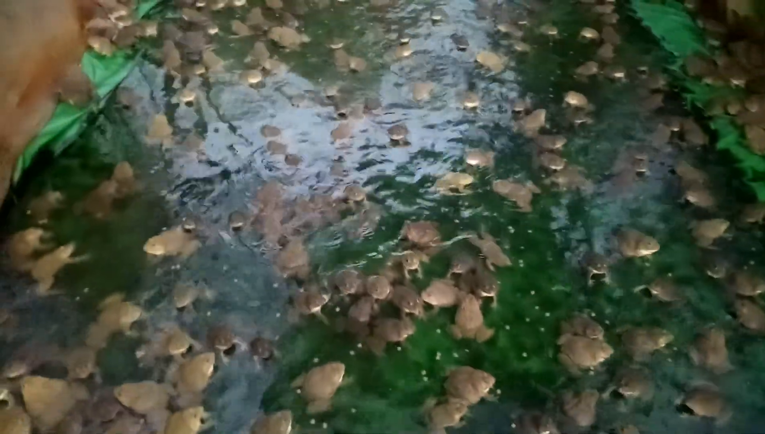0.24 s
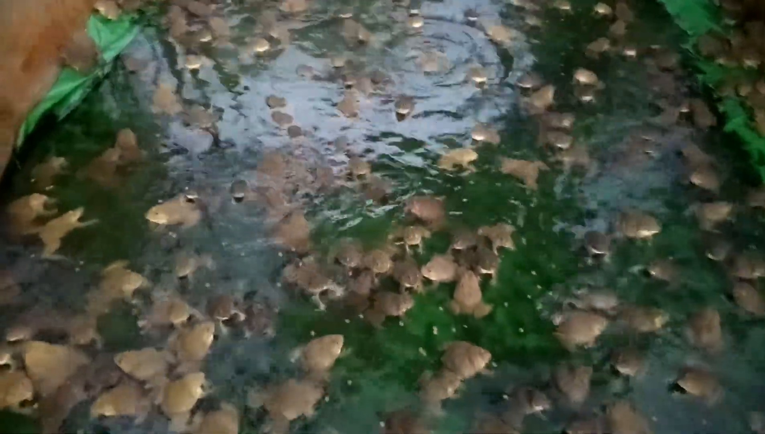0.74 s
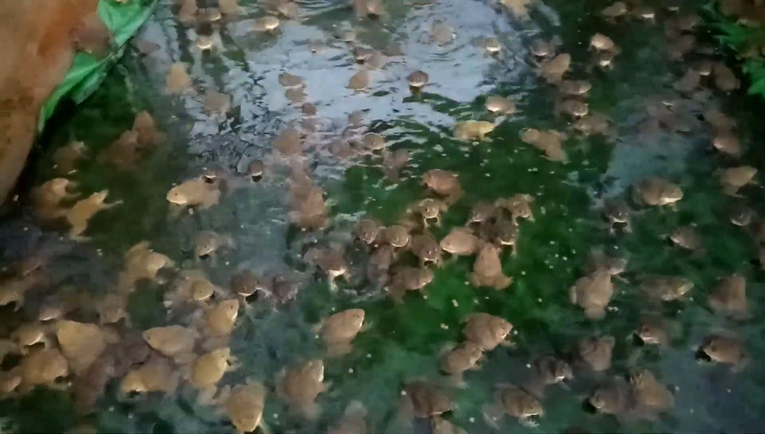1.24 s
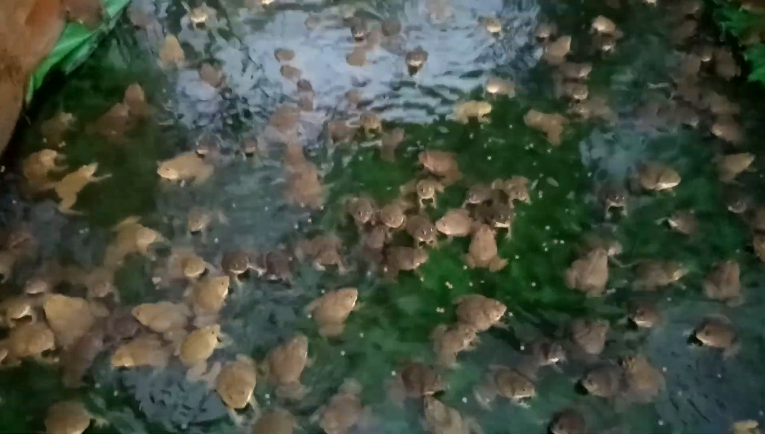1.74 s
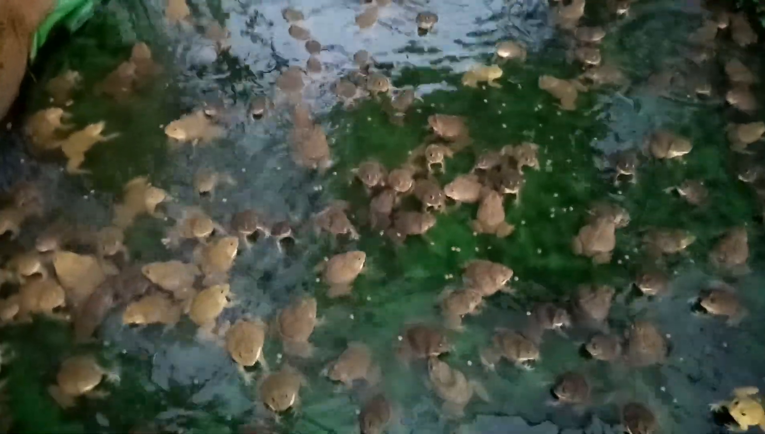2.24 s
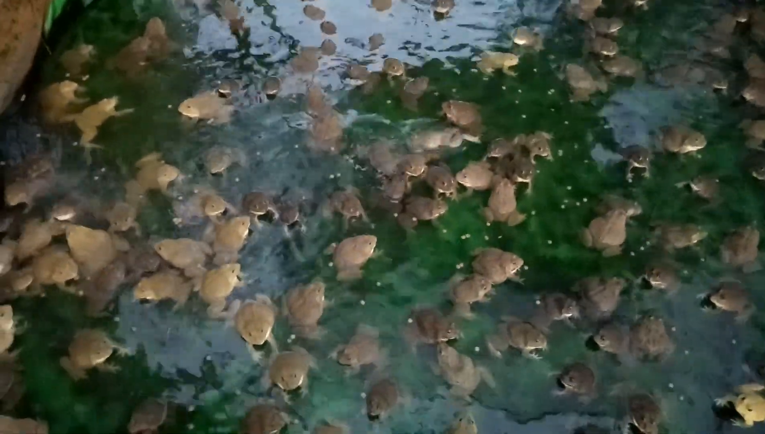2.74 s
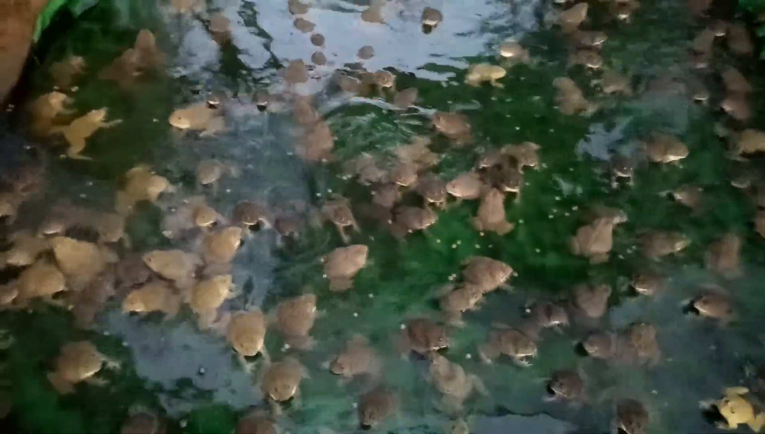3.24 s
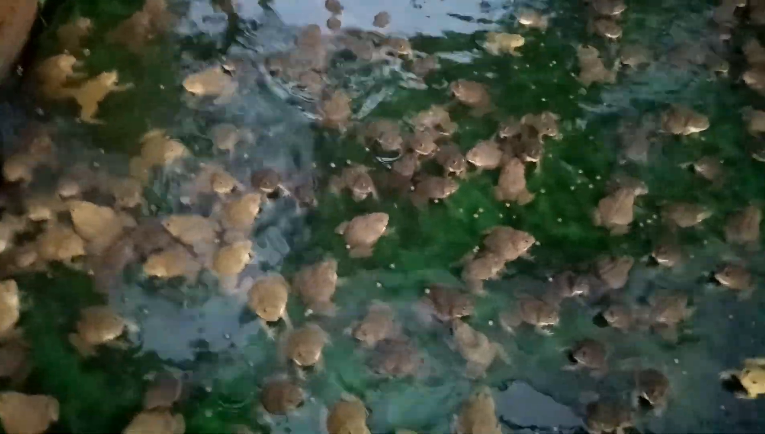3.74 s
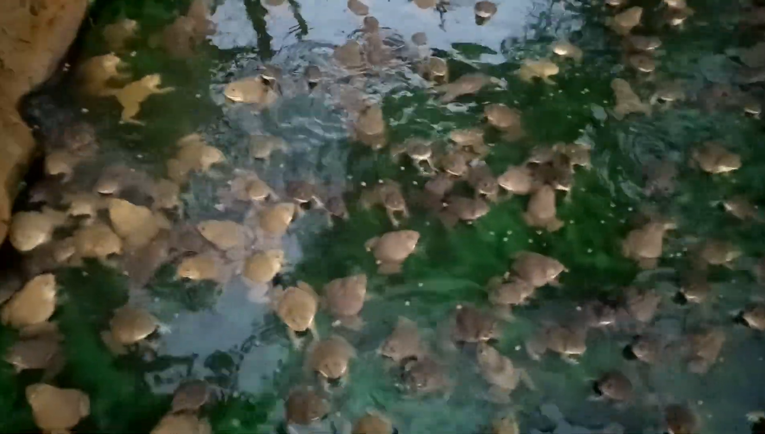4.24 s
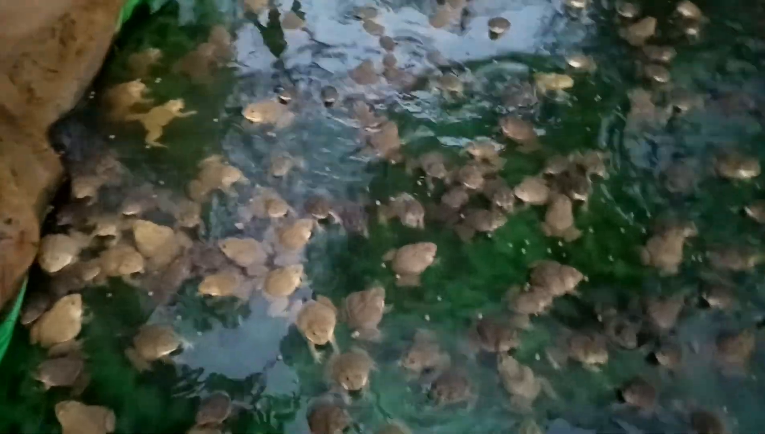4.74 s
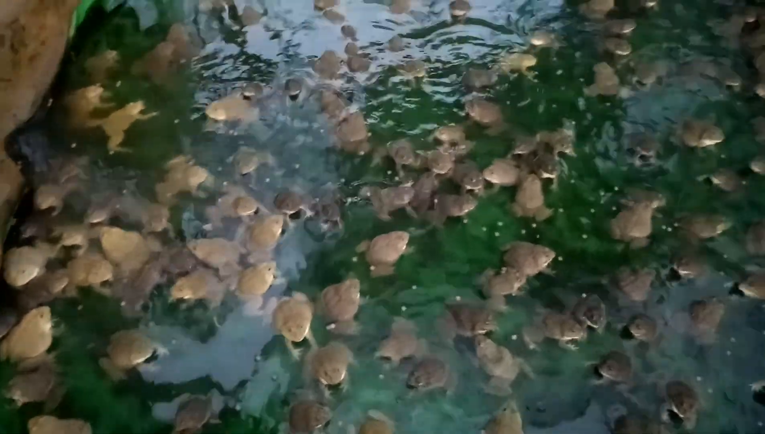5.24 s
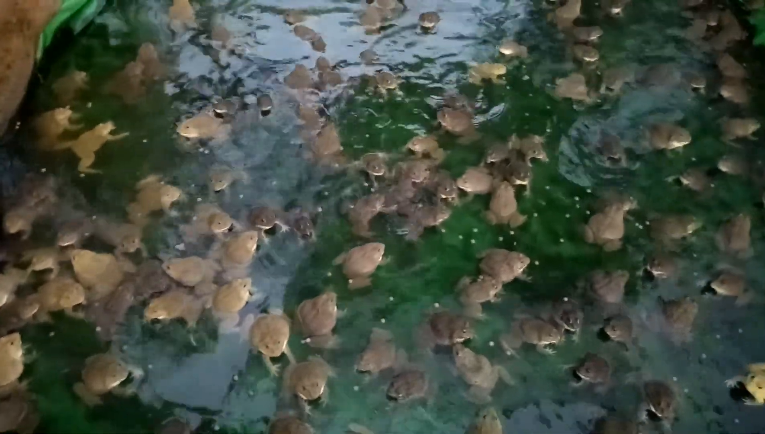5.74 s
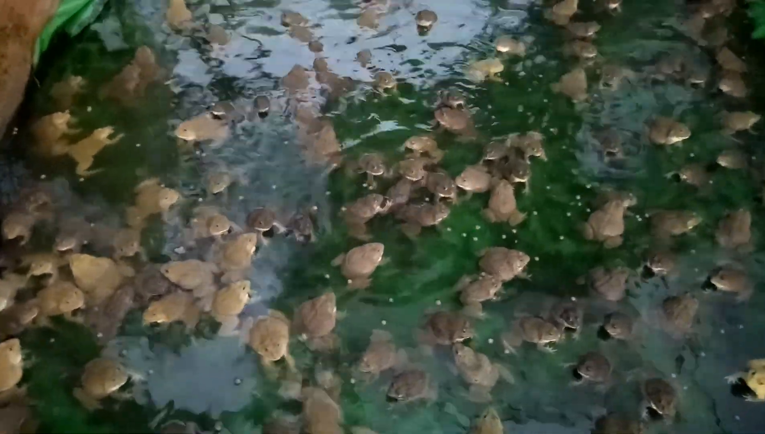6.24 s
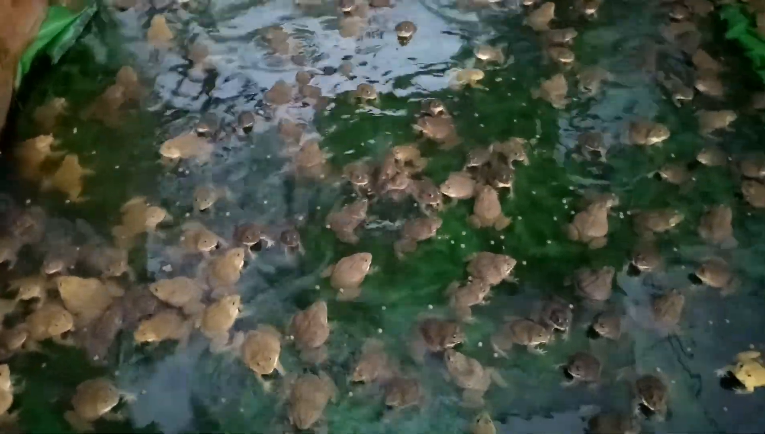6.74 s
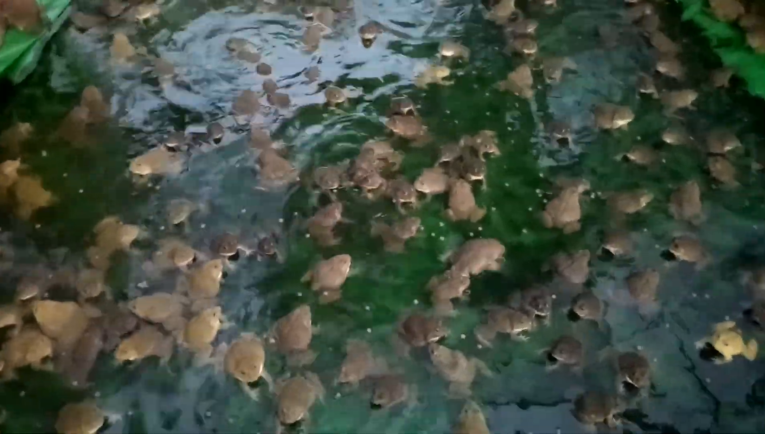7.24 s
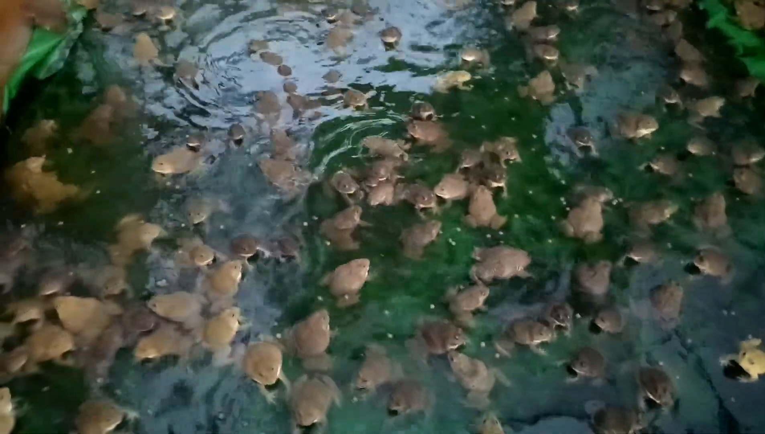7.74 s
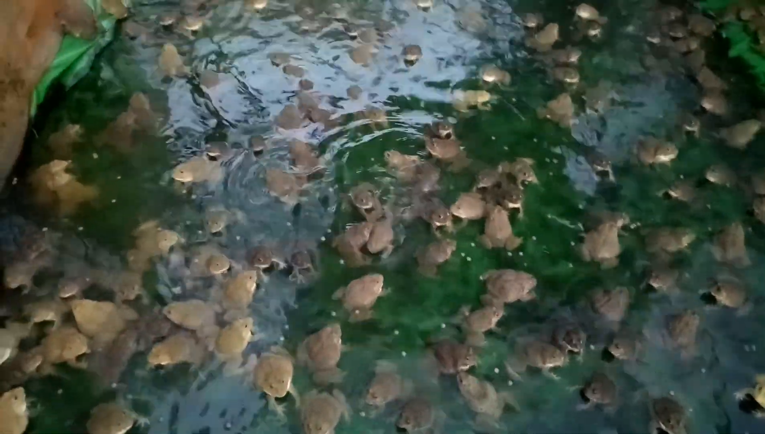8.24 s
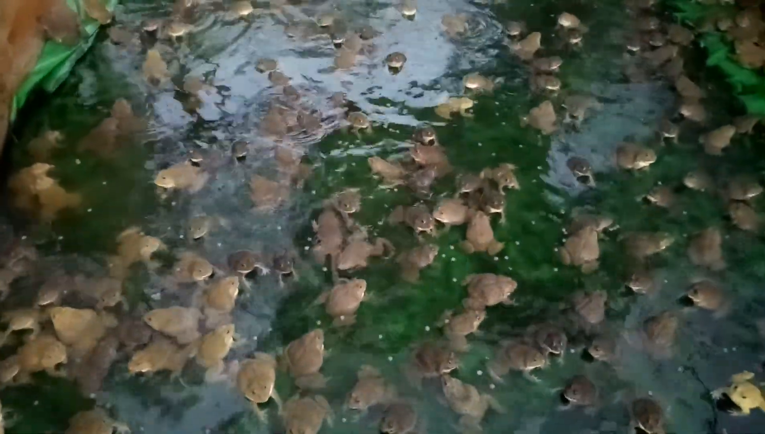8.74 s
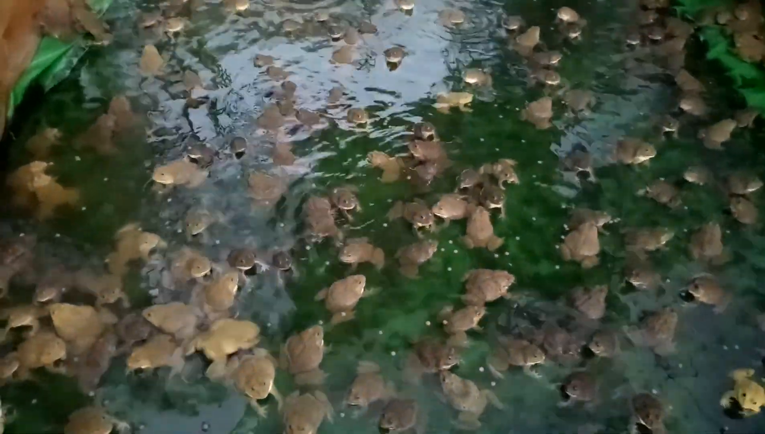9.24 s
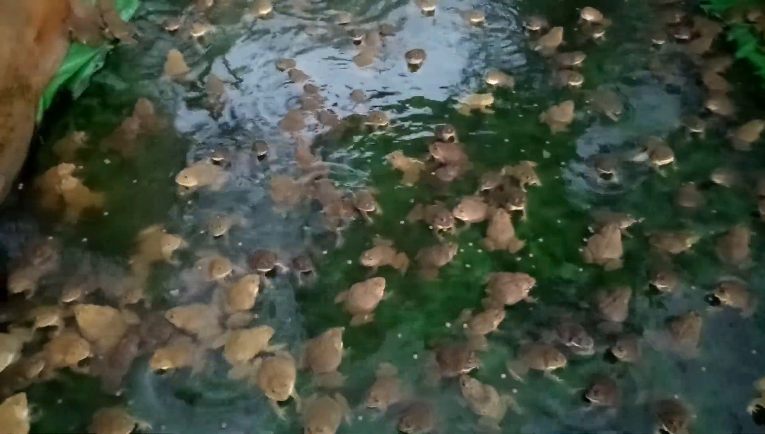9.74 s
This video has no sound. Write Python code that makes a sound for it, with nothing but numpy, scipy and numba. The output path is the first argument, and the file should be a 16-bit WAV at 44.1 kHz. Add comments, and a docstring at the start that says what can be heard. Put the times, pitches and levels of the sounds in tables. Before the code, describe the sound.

An open-air frog pond, quiet except for faint high crickets, soft hiss and light low wind. From 0 to 0.9 s small bright plops, droplets and rising bubble glugs come quickly. Dull handling thuds fall near 1.2 and 1.3 s. Another plop and paddle comes at 1.8 s, then a denser splashing flurry at 2.7-3.0 s. More plops and bubbles follow at 3.3-4.7 s, with heavy bumps at 3.4 and a lighter one near 4.4 s. One short, low, pulsed croak sounds at 5.3 s, then small bubbles, and a cluster of plops around 6.2 s. From 6.9 s dry feed rattles in a plastic tub close by, growing into hard, hollow clatter at 7.3-8.7 s. After a brief lull with small plops, it rattles again at 9.0-9.6 s. Plops at 9.8 s and two sharp knocks near 9.97 s end it. Left carries nearly everything; covered right is muffled and hissy.

```python
"""Plops, small bubbles, spray and one croak as frogs hop and paddle in a shallow pond, under crickets.
Later dry feed rattles in a plastic tub beside the hand-held phone. Water is dying sines, often climbing in pitch;
feed rings the tub's modes; spray, wind, field, hiss and faint passing bands are shaped noise. Left is the open
port, with light wind; right is covered by the hand: only hiss, bumps and the dull part of the rattle."""
import sys
import numpy as np
from scipy import signal
from scipy.fft import rfft, irfft
from scipy.io import wavfile
from scipy.ndimage import uniform_filter1d
from numba import njit

SR = 44100
rng = np.random.default_rng(int(sys.argv[2]) if len(sys.argv) > 2 else 0)


def log_audio(samples):
    """Write samples as a 16-bit WAV file to the path given in sys.argv[1]."""
    # one column per channel
    frames = np.atleast_2d(samples).T
    # limit to full scale, then quantise
    limited = np.clip(frames, -1, 1)
    pcm = np.round(limited * 32767).astype(np.int16)
    wavfile.write(sys.argv[1], SR, pcm)


N = 441000

# spells of paddling: (start [s], length [s], level [dB], centre of the bubbles [Hz])
PADDLE = [(0, 0.24, -61, 2090), (0.286, 0.078, -57.5, 4000), (0.633, 0.24, -54, 2090),
          (1.753, 0.15, -56.5, 1970), (1.951, 0.055, -56.5, 3210), (2.679, 0.28, -52, 2610),
          (3.283, 0.13, -61, 2390), (3.407, 0.24, -58, 2230), (3.706, 0.24, -63.5, 2480),
          (3.961, 0.4, -58.5, 1677), (4.392, 0.17, -50, 2160), (4.568, 0.095, -49.5, 2220),
          (4.666, 0.26, -64, 2710), (5.455, 0.15, -61, 2780), (5.65, 0.095, -55, 2310),
          (6.182, 0.074, -47.5, 2503), (6.284, 0.14, -58.5, 1410), (6.625, 0.21, -61.5, 2440),
          (8.928, 0.087, -57, 2170), (9.872, 0.052, -44, 2075)]


def undb(db):
    """Amplitude factor of a level in dB."""
    return 10 ** (np.asarray(db) / 20)


def level(x, db):
    """Scale x to an RMS level in dB."""
    return x * undb(db) / np.sqrt(np.mean(x ** 2))


def band(x, lo_hz, hi_hz, order=2):
    """Butterworth band-pass."""
    sos = signal.butter(order, [lo_hz, min(hi_hz, .45 * SR)], "bandpass", fs=SR, output="sos")
    return signal.sosfilt(sos, x)


def coloured(spectrum):
    """Steady noise shaped by (frequency, dB) points, interpolated over log frequency."""
    hz, db = np.transpose(spectrum)
    bin_hz = np.arange(N // 2 + 1) * SR / N
    gain = undb(np.interp(np.log(bin_hz + 1), np.log(hz), db))
    return irfft(rfft(rng.standard_normal(N)) * gain, N)


def walk(rate_hz):
    """Smooth random curve: levels held 1 / rate_hz s, slewed twice; standard deviation about 0.8."""
    k = int(SR / rate_hz)
    held = np.repeat(rng.standard_normal(N // k + 1), k)
    return 1.07 * uniform_filter1d(uniform_filter1d(held, k), k)[:N]


@njit
def rings(length, sr, s, hz, size, t60, rise, attack):
    """Dying sines with a soft start; pitch moves by the share rise over each life t60."""
    out = np.zeros(length)
    for k in range(len(s)):
        start, n = int(s[k] * sr), int(t60[k] * sr)
        a, fade, phase = size[k], 1000. ** (-1 / n), 0.
        for i in range(max(0, min(n, length - start))):
            out[start + i] += a * min(i / (attack[k] * sr), 1.) * np.sin(phase)
            phase += 2 * np.pi * hz[k] * (1 + rise[k] * i / n) / sr
            a *= fade
    return out


def ring(s, hz, size, t60, rise, attack):
    """Sum of dying sines; the arguments broadcast (s, t60 and attack in seconds)."""
    grids = np.broadcast_arrays(s, hz, size, np.maximum(t60, 1e-3), rise, np.maximum(attack, 1e-5))
    rows = (np.array(v, float).ravel() for v in grids)
    return rings(N, 1. * SR, *rows)


def bursts(s, size, t60):
    """Envelope that jumps at each time and dies away."""
    hits = np.zeros(N)
    np.add.at(hits, (s * SR).astype(int), size)
    return signal.lfilter([1], [1, -1000 ** (-1 / (t60 * SR))], hits)


def spells(t, start, length, db, attack_db, sag_db, release_db):
    """Level in dB of each spell at times t: rises to its start, sags while on, dies away (slopes per s)."""
    since = t - start[:, None]
    over = np.maximum(since - length[:, None], 0)
    return db[:, None] + attack_db * np.minimum(since, 0) - sag_db * np.maximum(since, 0) - release_db * over


def splashes(count=14):
    """A short plop, then a shower of droplet notes around its pitch that thins out."""
    # (time [s], level [dB], plop [Hz])
    splash = [(0.013, -32, 1560), (0.317, -34.5, 4450), (0.427, -38.5, 3000), (0.472, -32.5, 3880),
              (0.63, -28.5, 1650), (0.749, -36.5, 2530), (0.823, -40, 4000), (1.772, -32.5, 3520),
              (1.97, -37, 4340), (2.693, -38.5, 3700), (2.735, -30.5, 2840), (2.738, -41, 1100),
              (2.794, -28, 3980), (2.797, -43, 2060), (2.822, -31.5, 3060), (2.824, -40, 1850),
              (2.863, -33, 3750), (2.924, -42.5, 1470), (3.027, -39.5, 3390), (3.422, -38.5, 2140),
              (3.459, -29.5, 3470), (3.489, -36.5, 1920), (3.755, -27, 3860), (4.052, -35, 2140),
              (5.122, -43, 4300), (5.732, -42, 2560), (6.172, -35.5, 3100), (6.198, -32.5, 2250),
              (6.238, -33.5, 2080), (6.291, -35, 3100), (6.327, -37.5, 1870), (6.348, -34.5, 1850),
              (6.612, -48.5, 976), (6.755, -46.5, 1445), (7.123, -39.5, 3200), (8.941, -40, 1850),
              (9.003, -37.5, 1270), (9.801, -33, 3460), (9.886, -31.5, 1620)]
    s, db, hz = np.transpose(splash)
    plop = ring(s, hz, undb(db), 28 / hz, 0.018, 1.54 / hz)
    late, pitch, big, rise = np.moveaxis(rng.random((len(s), 4, count)), 1, 0)
    late_s = .05 * late ** 1.5
    drop_hz = np.clip(hz[:, None] * 2 ** (1.6 * (pitch - .5)), 300, 7500)
    drop_db = db[:, None] - 10.0 - 250 * late_s - 12 * big
    drops = ring(s[:, None] + late_s, drop_hz, undb(drop_db), 25 / drop_hz, 1.0 * rise, 0.29 / drop_hz)
    return plop + drops


def paddling(count=240):
    """Each spell is a cloud of small bubbles of many sizes, calming after its first quarter."""
    start, length, db, centre_hz = np.transpose(PADDLE)[:, :, None]
    when, pitch, wide, big, cycles = np.moveaxis(rng.random((len(PADDLE), 5, count)), 1, 0)
    # each kick leaves a short clump of 20 bubbles
    small, kick = np.repeat(rng.random((2, len(PADDLE), count // 20)), 20, axis=2)
    froth_s = start + length * when
    froth_hz = np.clip(centre_hz * 8.93 ** (wide - .5), 300, 6500)
    clump_when = (np.arange(count) // 20 + kick) * 20 / count + .1 * (when - .5)
    clump_s = np.maximum(start + length * clump_when, 0)
    hz = np.clip(centre_hz * 2 ** (1.293 * (small - .5) + 0.8 * (pitch + wide - 1)), 300, 6500)
    t60 = (8 + 100 * cycles ** 4) / hz
    size_db = db + np.minimum(-4.2 * np.log(big), 15) - 9 * np.abs(clump_when - .25) + 9.5
    # the more bubbles overlap, the smaller each one is for the same level
    clump_size = undb(size_db) * np.sqrt(length / (count * t60))
    clumps = ring(clump_s, hz, clump_size, t60, 0.22 * cycles, 4.1 / hz)
    # a fine froth of all sizes fills the gaps between the kicks
    froth_size = undb(size_db - 7.0) * np.sqrt(length * froth_hz / (count * 20))
    return clumps + ring(froth_s, froth_hz, froth_size, 20 / froth_hz, 0., 2 / froth_hz)


def glugs():
    """Larger bubbles swell, ring clearly and climb in pitch as they reach the surface."""
    # (time [s], level [dB], start pitch [Hz], rise [share], t60 [s])
    glug = [(0.098, -41.5, 1190, 0.98, 0.059), (0.65, -36, 1435, 0.25, 0.046),
            (0.716, -33.5, 889, 1.86, 0.12), (1.255, -45, 1540, 0.22, 0.053),
            (1.798, -38.5, 1010, 0.46, 0.029), (3.33, -41.5, 1780, 0.23, 0.028),
            (3.547, -38, 1800, 0.27, 0.035), (3.724, -36, 1660, 0.24, 0.028),
            (4.225, -41, 1282, 0.57, 0.11), (4.288, -39.5, 738, 0.87, 0.037),
            (4.444, -39, 820, 1.52, 0.053), (4.501, -42, 760, 0.64, 0.07), (5.567, -33.5, 1490, 0.16, 0.02),
            (6.213, -42.5, 570, 0.52, 0.045), (7.199, -32.5, 1395, 0.14, 0.016)]
    s, db, hz, rise, t60 = np.transpose(glug)
    return ring(s, hz, undb(db), t60, rise, 0.16 * t60)


def spray():
    """Fine drops tick sharply and hiss on; a thin mist jumps up with each spell of paddling and fades."""
    # (time [s], level [dB])
    ticks = [(0.16, -60.5), (2.815, -51.5), (2.866, -54), (2.9263, -57.5), (3.502, -59.5), (6.24, -53.5),
             (7.309, -59.5), (9.4524, -58), (9.493, -64), (9.8857, -56.5)]
    s, db = np.transpose(ticks)
    tick = undb(0.5) * uniform_filter1d(bursts(s, undb(db), 0.0082), size=61)
    tail = undb(-11.0) * bursts(s, undb(db), 0.093)
    start, _, stir_db, _ = np.transpose(PADDLE)
    mist = undb(-28.5) * uniform_filter1d(bursts(start, undb(stir_db), 0.76), size=2000)
    mist = mist * undb(1.6 * walk(48))
    hiss = level(band(rng.standard_normal(N), 4600, 6800, order=1), 0)
    return (tick + tail + mist) * hiss


def croak():
    """One short croak: throat pulses ring the sac and the mouth; the higher notes fade first."""
    # (start [s], end [s], pulse rate [Hz])
    pulse_train = (5.256, 5.35, 110)
    # resonances: (frequency [Hz], level [dB], t60 [s])
    throat = [(360, -47, 0.014), (1090, -51.5, 0.039)]
    start, end, rate_hz = pulse_train
    s = np.arange(start, end, 1 / rate_hz)
    chance = rng.standard_normal((len(s), 2)).T
    hz, db, t60 = np.transpose(throat)
    fade_db = -90 * (s - start) + 2.1 * chance[1]
    pulse_s = (s + 0.00104 * chance[0])[:, None]
    pulse_hz = hz * (1 + 0.026 * chance[1][:, None])
    return ring(pulse_s, pulse_hz, undb(fade_db[:, None] * hz / 800 + db), t60, 0., 0.64 / hz)


def tub(count=5000):
    """Every grain and hard knock of feed rings the same tub modes, each with its own share."""
    # tub modes, hollow note first: (frequency [Hz], level [dB], t60 [s])
    modes = [(492, 8, 0.016), (890, -11, 0.013), (1344, -4.5, 0.0074), (1980, -4, 0.01), (2910, 2, 0.0033),
             (3860, -14, 0.0099), (5530, -29.5, 0.0062)]
    # shakes, feed sliding inside: (start [s], length [s], level [dB], hollow note offset [dB])
    shake = [(6.912, 0.022, -48.5, -5.5), (7.017, 0.069, -58, 1), (7.272, 0.465, -39.5, -8),
             (7.809, 0.22, -47, -13.5), (7.964, 0.37, -44, -11), (8.37, 0.32, -55.5, -10.5),
             (9.014, .1, -53, -6), (9.114, 0.51, -51, -6)]
    # hard knocks of feed on the tub: (time [s], level [dB], hollow note offset [dB])
    knock = [(6.929, -29.5, -6), (7.23, -37.5, 5.5), (7.289, -31, -11), (7.311, -22.5, -8),
             (7.382, -23, -14), (7.4415, -36, 3), (7.4924, -29.5, -4), (7.5083, -27.5, -3.5),
             (7.542, -24, -10), (7.6, -36, -20), (7.621, -26.5, -13), (7.6685, -33, -10),
             (7.751, -21.5, -11), (7.769, -23, -29), (7.931, -31, 0), (7.96, -24, -24), (7.982, -23, -27),
             (8.0207, -31.5, -16), (8.044, -31.5, -23), (8.078, -29, -22), (8.096, -27, -11.5),
             (8.12, -24, -25), (8.139, -20.5, -36), (8.179, -23.5, -38), (8.21, -20.5, -17.5),
             (8.263, -16, -28), (8.3, -25.5, 1), (8.318, -27, -12), (8.356, -37, -11), (8.443, -22, -12.5),
             (8.4876, -25.5, -27), (8.495, -22.5, -40), (8.604, -17, -9), (8.638, -29.5, -13),
             (9.013, -38.5, 2), (9.1, -16, -21.5), (9.117, -23.5, -17), (9.147, -32.5, -5),
             (9.171, -30.5, -6.5), (9.2125, -31, -23), (9.221, -22.5, -32), (9.261, -21.5, -21),
             (9.292, -25.5, -12.5), (9.32, -31.5, -12), (9.336, -34, -11), (9.388, -33.5, -10.5),
             (9.451, -38, -10), (9.493, -29.5, -28), (9.556, -36.5, -2), (9.575, -42, -8),
             (9.9653, -19.5, -8), (9.9703, -18.5, -7)]
    attack_db_per_s, sag_db_per_s, release_db_per_s = 506, 5, 181.5
    mode_hz, mode_db, t60 = np.transpose(modes)
    shake_s, length, shake_db, shake_hollow_db = np.transpose(shake)
    t0 = shake_s[0]
    when, big = rng.random((count, 2)).T
    s = t0 + when * (N / SR - t0)
    i = (s * SR).astype(int)
    levels_db = spells(s, shake_s, length, shake_db, attack_db_per_s, sag_db_per_s, release_db_per_s)
    slide_db, slide_hollow_db = levels_db.max(axis=0), shake_hollow_db[levels_db.argmax(axis=0)]
    grain_db = slide_db + np.minimum(-4.5 * np.log(big), 16) - 10.5
    # the feed slides in lumps, and the hollow note swells on its own
    grain_db = grain_db + 2.25 * walk(45)[i]
    slide_hollow_db = slide_hollow_db + 2.36 * walk(25)[i]
    knock_s, knock_db, hollow_db = np.transpose(knock)
    db = np.r_[grain_db, knock_db][:, None] + mode_db
    db[:, 0] += np.r_[slide_hollow_db, hollow_db]
    where = rng.standard_normal((len(db), 3, len(modes)))
    # grains land on floor or rim: some dull, some bright (dB per octave)
    tilt_db = -1.5 + 3.6 * where[:count, 2, :1]
    db[:count, 1:] += tilt_db * np.log2(mode_hz[1:] / mode_hz[3])
    # the next two notes of a knock follow its hollow note: weak for knocks on the rim
    db[count:, 1:3] += 0.43 * (hollow_db[:, None] + 10)
    spread_db = np.r_[np.full(count, 5.0), np.full(len(knock), 1.5)][:, None]
    # the walls do not all start at once
    start = np.r_[s, knock_s][:, None] + .0004 * np.abs(where[:, 2])
    hz = mode_hz * (1 + 0.024 * spread_db * where[:, 0])
    return ring(start, hz, undb(db + spread_db * where[:, 1]), t60, 0., 1.513 / mode_hz)


def bumps():
    """The hand bumps the phone: a dull thud sinking in pitch, with a softer, higher knock."""
    # (time [s], left level [dB], right level [dB], start pitch [Hz], t60 [s])
    bump = [(1.189, -30, -74, 73, 0.09), (1.314, -56, -26.5, 78, 0.06), (3.42, -20, -49, 186, 0.025),
            (3.435, -21.5, -42, 91.5, 0.078), (4.382, -24.5, -60, 203, 0.056)]
    s, left_db, right_db, hz, t60 = np.transpose(bump)
    sides = []
    for db in (left_db, right_db):
        thud = ring(s, hz, undb(db), t60, -0.21, 0.42 / hz)
        tap = ring(s, 4.28 * hz, undb(db - 19), 1.07 * t60, 0., 0.24 / hz)
        sides.append(thud + tap)
    return np.array(sides)


def wind():
    """Low flutter on the open port: band noise under a steady breeze level and a few gusts."""
    # (start [s], length [s], level [dB])
    gust = [(0.925, 0.38, -61.5), (4.006, 0.39, -60.5), (6.237, 0.22, -61), (7.088, 0.5, -63.5)]
    centre_hz, width_hz, breeze_db = 126.2, 102.4, -72
    attack_db_per_s, release_db_per_s = 162, 97
    flutter = band(rng.standard_normal(N), centre_hz - width_hz / 2, centre_hz + width_hz / 2, order=3)
    gust_db = spells(np.arange(N) / SR, *np.transpose(gust), attack_db_per_s, 0, release_db_per_s)
    flutter = level(flutter * undb(5 * walk(16)), 0)
    return flutter * undb(np.maximum(gust_db.max(axis=0), breeze_db))


def crickets():
    """A far chorus of throbbing narrow noise bands, and one nearer pulsed tone with a faint overtone."""
    # far chorus: (centre [Hz], width [Hz], level [dB])
    chorus = [(4080, 130, -89), (4583, 290, -77), (4978, 306, -79.5)]
    # chirps of the near cricket: (start [s])
    chirp_starts = [1.1, 1.55, 2.6, 3.25, 3.6, 5.1, 6.05, 6.92, 7.3, 8.4, 8.88]
    chirp_s, chirp_hz, chirp_db, overtone_db, pulse_hz = 0.18, 4730, -73, -16.5, 51
    t = np.arange(N) / SR
    far = np.zeros(N)
    for hz, w, db in chorus:
        singers = level(band(rng.standard_normal(N), hz - w / 2, hz + w / 2), db)
        far += singers * undb(0.92 * walk(4.6) + 4.1 * walk(60))
    gate = sum(1. * ((t > s) & (t < s + chirp_s)) for s in chirp_starts)
    on = uniform_filter1d(gate, size=1500)
    phase = 2 * np.pi * np.cumsum(chirp_hz * (1 + 0.002 * walk(30))) / SR
    pulses = on * np.sin(np.pi * pulse_hz * t) ** 2 * undb(chirp_db)
    return far + pulses * (np.sin(phase) + undb(overtone_db) * np.sin(2 * phase))


def faint_bands(count=200):
    """Faint narrow bands of noise that come and go, a few placed and many at random."""
    # (start [s], length [s], centre [Hz], level [dB])
    placed = [(0.16, 0.46, 837, -67.5), (0.088, 0.4, 650, -68), (4.7, 0.54, 2200, -83.5)]
    when, long, pitch, big = rng.random((count, 4)).T
    scattered = np.c_[when * N / SR, .06 + .2 * long, 450 * 8 ** pitch, -84 + 8 * big]
    out = np.zeros(N + SR)
    for s, length, hz, db in np.r_[placed, scattered]:
        start, n = int(s * SR), int(length * SR)
        noise = rng.standard_normal(SR)[:n]
        out[start:start + n] += np.sqrt(np.hanning(n)) * level(band(noise, .965 * hz, 1.035 * hz), db)
    return out[:N]


def field():
    """Steady coloured noise of the open air."""
    # (frequency [Hz], relative level per Hz [dB])
    field_spectrum = [(30, 1.5), (100, -24), (250, 4), (600, -3), (2000, -14.5), (4000, -11.5),
                      (5800, -32.5), (9000, -29), (16000, -34)]
    return level(coloured(field_spectrum), -67.5)


def port_hiss():
    """Steady coloured hiss of the covered port."""
    # (frequency [Hz], relative level per Hz [dB])
    hiss_spectrum = [(30, -0.5), (90, 4.5), (250, -6.5), (700, -13), (2400, -17), (5000, -25.5),
                     (16000, -31)]
    return level(coloured(hiss_spectrum), -74.5)


def scene():
    """Pond, tub and air on the open left port; dull rattle through the case on the covered right."""
    open_port_db, port_hz = 10.5, 5080
    through_case_db, case_hz = -19.5, 606
    case_lead_samples = 10  # sound through the case arrives first
    banks_db, banks_t60_s = -8.5, 0.2
    rattle = tub()
    water = splashes() + paddling() + glugs() + croak()
    bands = faint_bands()
    # a short blur follows: the banks and netting send back water and rattle; the faint bands get it too
    t = np.arange(SR // 2) / SR
    blur = rng.standard_normal(len(t)) * 1000 ** (-t / banks_t60_s)
    blurred = signal.fftconvolve(water + bands + 0.5 * rattle, blur / np.linalg.norm(blur))[:N]
    mix = water + bands + rattle + undb(banks_db) * blurred
    # the recessed port rolls off steeply above port_hz, but for one weak higher window
    port_sos = signal.butter(6, port_hz, fs=SR, output="sos")
    main = signal.sosfilt(port_sos, band(mix, 253, 15000))
    window = undb(-7.5) * band(mix, 5880, 7500)
    air = main + window + spray() + crickets() + wind()
    left = undb(open_port_db) * np.roll(air, case_lead_samples) + field()
    right = undb(through_case_db) * band(rattle, 280, case_hz) + port_hiss()
    return np.array([left, right]) + bumps()


def record(dry):
    """The phone cuts the top, above 15.5 kHz."""
    return signal.sosfilt(signal.ellip(8, .2, 70, 15500, fs=SR, output="sos"), dry)


dry = scene()
out = record(dry)
log_audio(out)
```